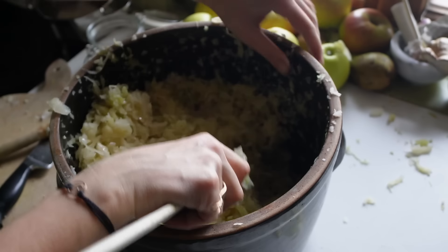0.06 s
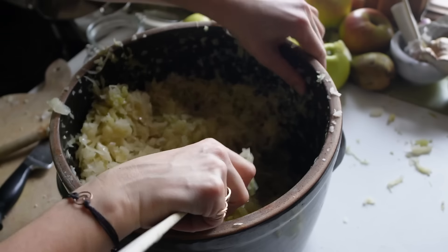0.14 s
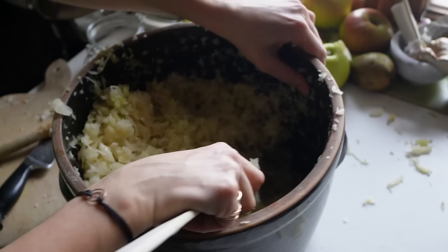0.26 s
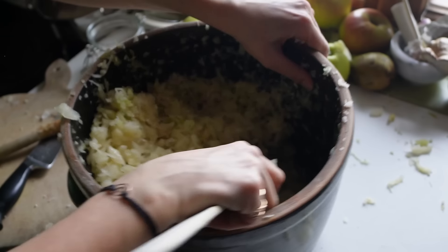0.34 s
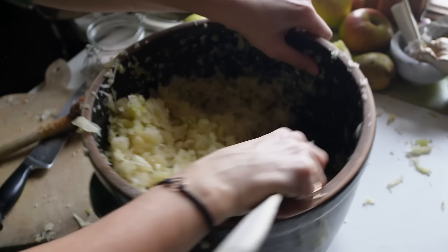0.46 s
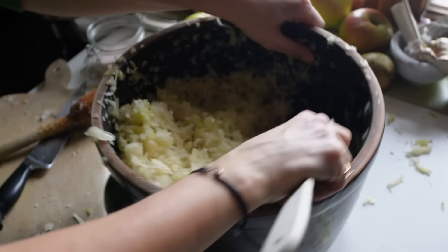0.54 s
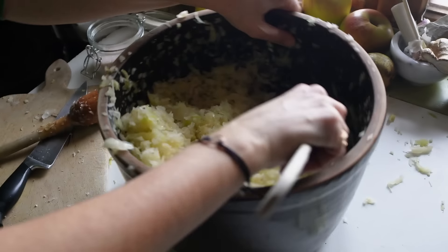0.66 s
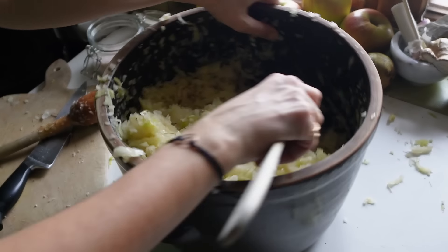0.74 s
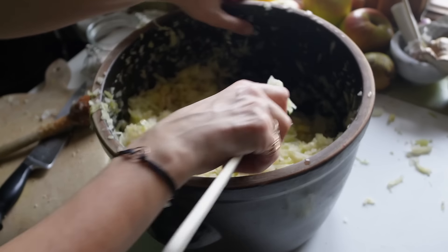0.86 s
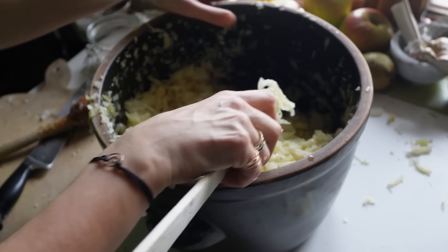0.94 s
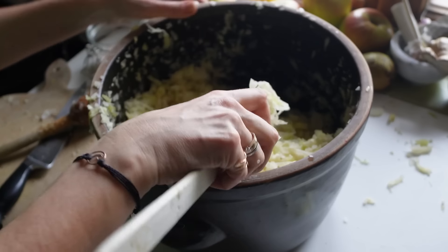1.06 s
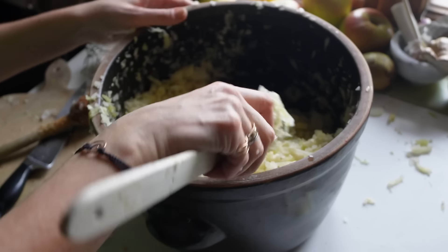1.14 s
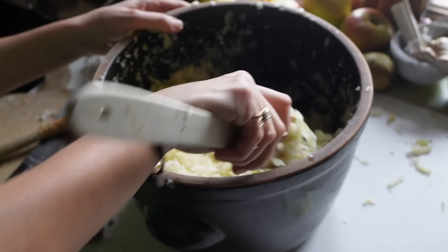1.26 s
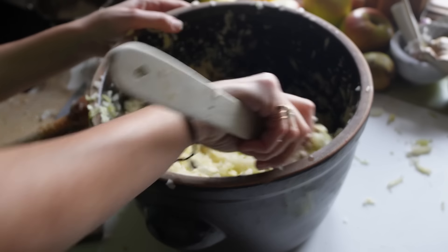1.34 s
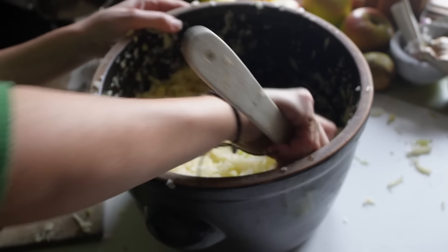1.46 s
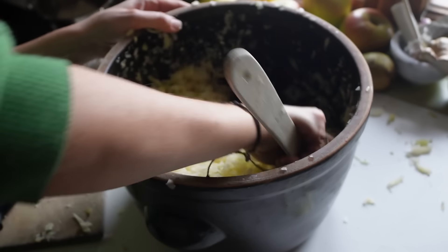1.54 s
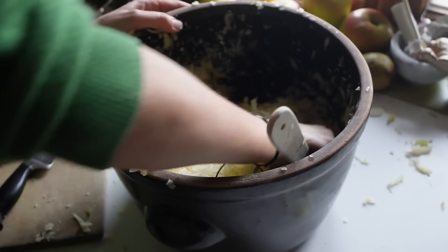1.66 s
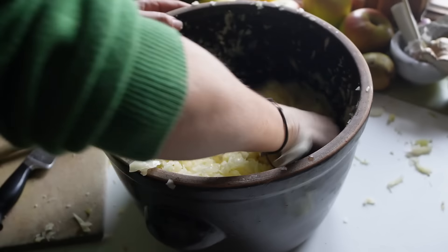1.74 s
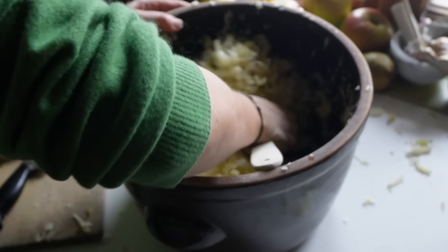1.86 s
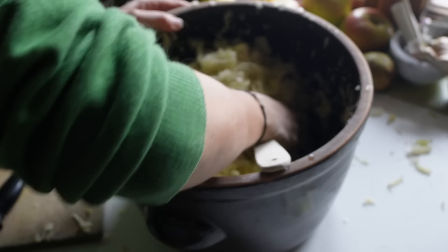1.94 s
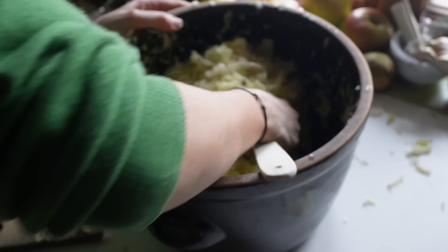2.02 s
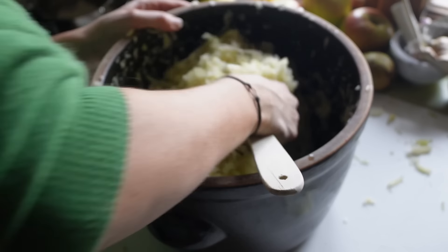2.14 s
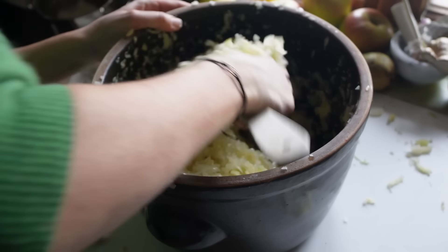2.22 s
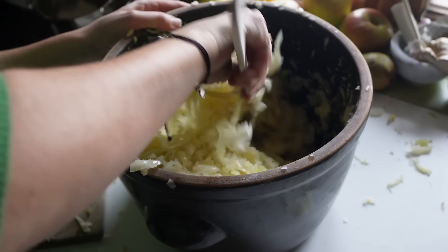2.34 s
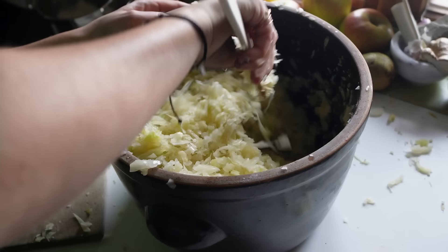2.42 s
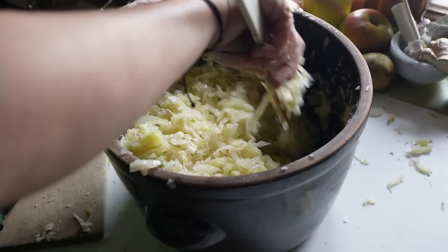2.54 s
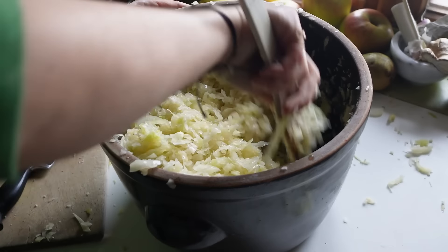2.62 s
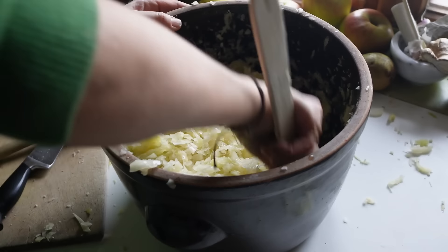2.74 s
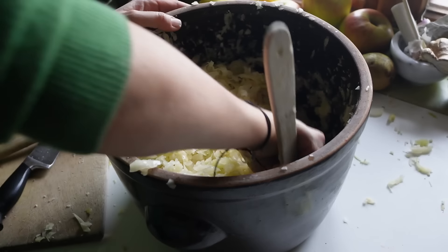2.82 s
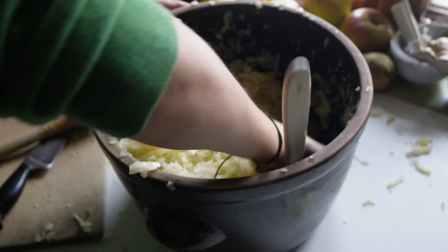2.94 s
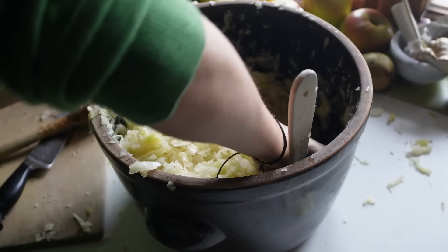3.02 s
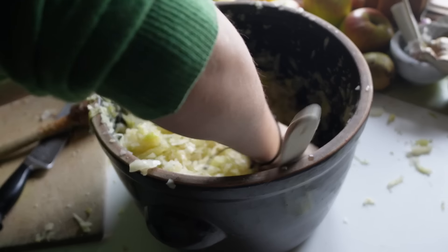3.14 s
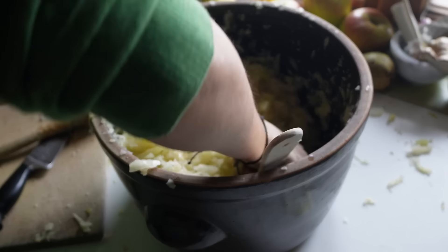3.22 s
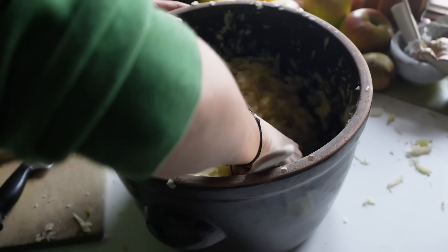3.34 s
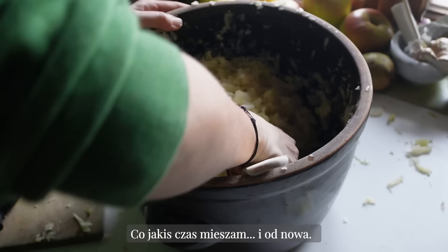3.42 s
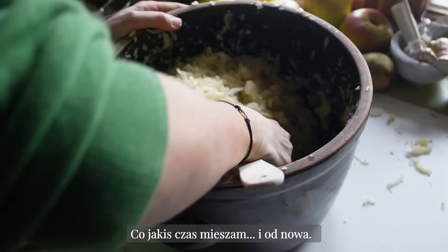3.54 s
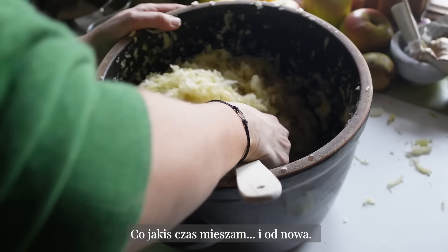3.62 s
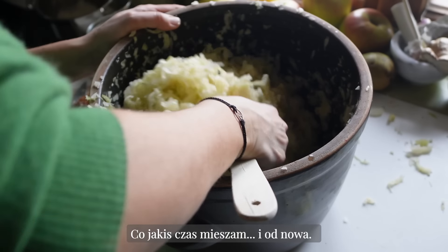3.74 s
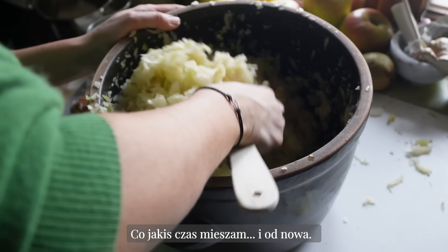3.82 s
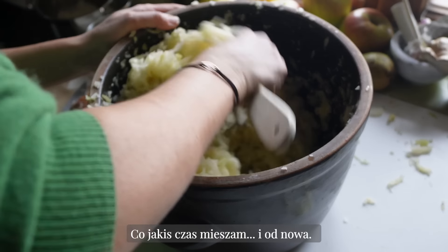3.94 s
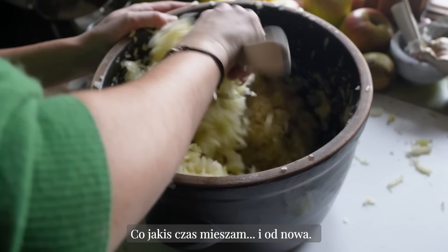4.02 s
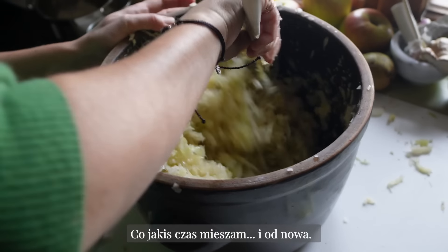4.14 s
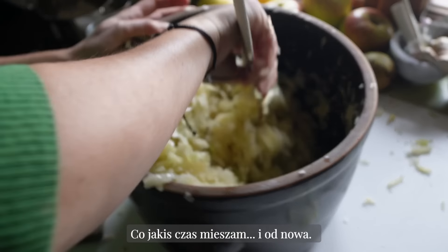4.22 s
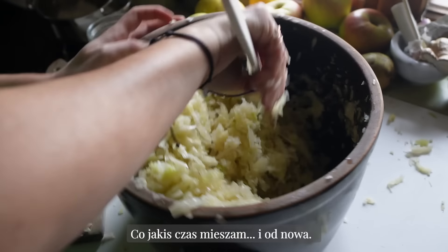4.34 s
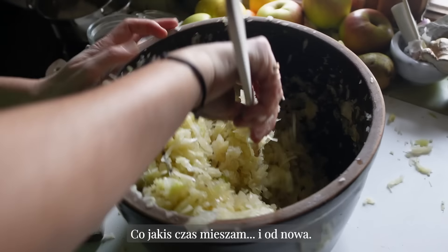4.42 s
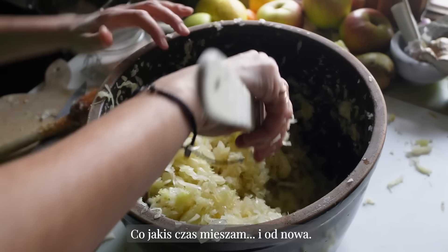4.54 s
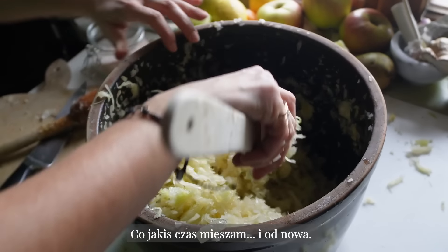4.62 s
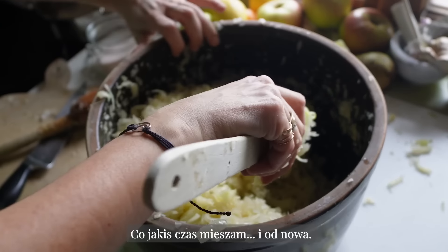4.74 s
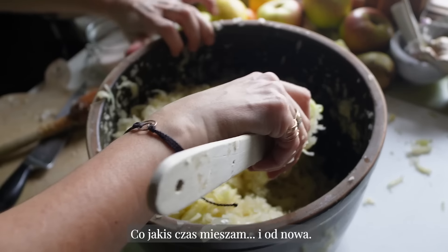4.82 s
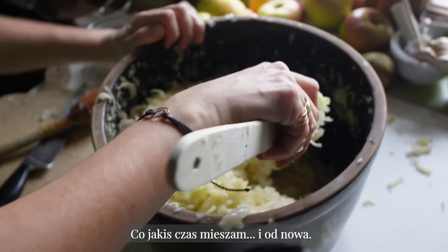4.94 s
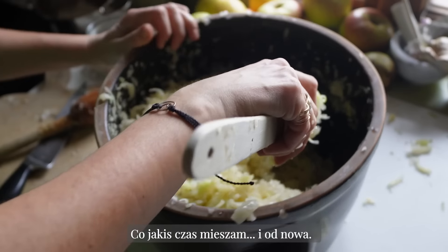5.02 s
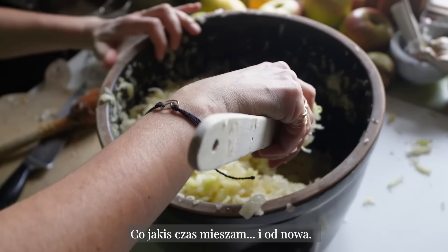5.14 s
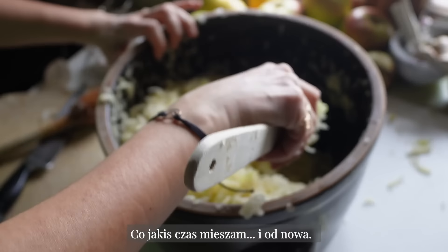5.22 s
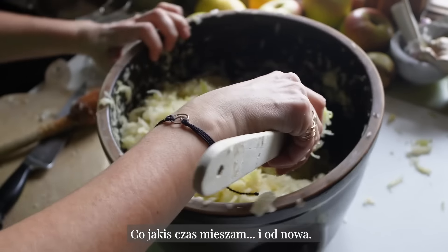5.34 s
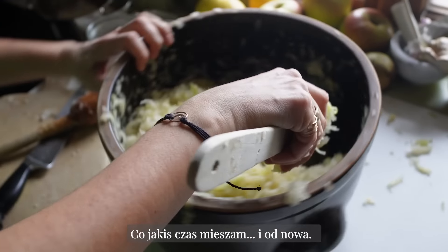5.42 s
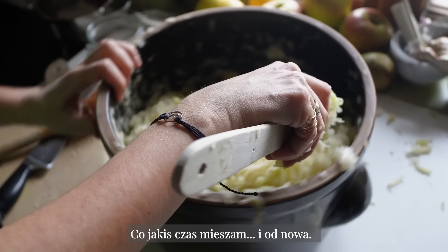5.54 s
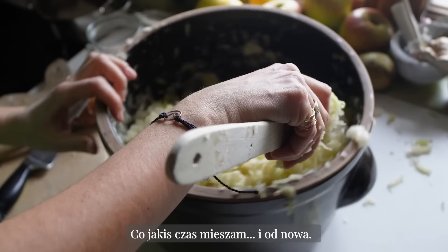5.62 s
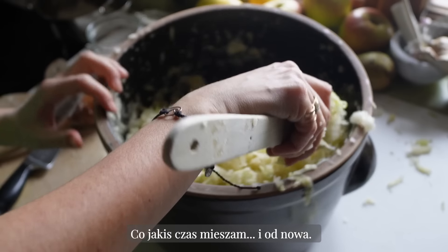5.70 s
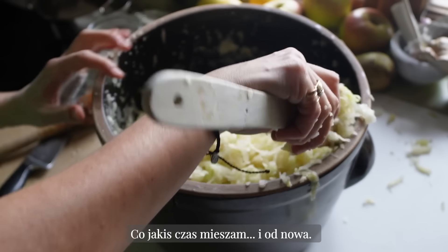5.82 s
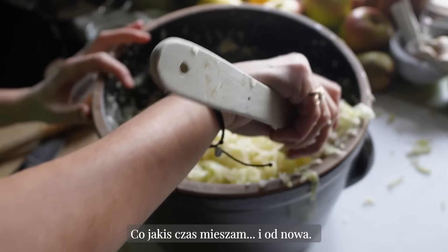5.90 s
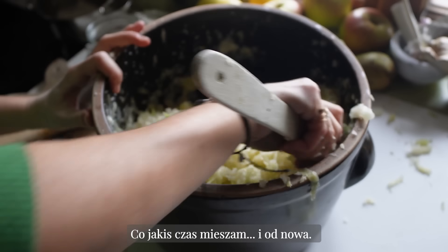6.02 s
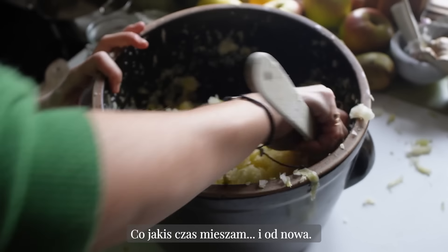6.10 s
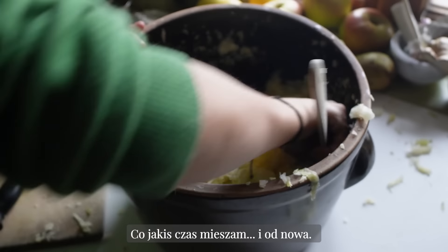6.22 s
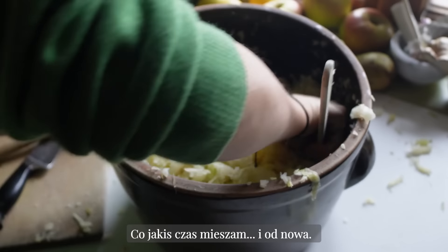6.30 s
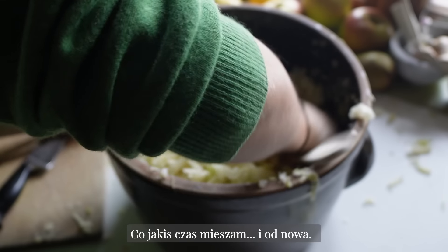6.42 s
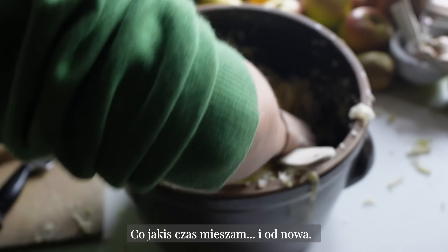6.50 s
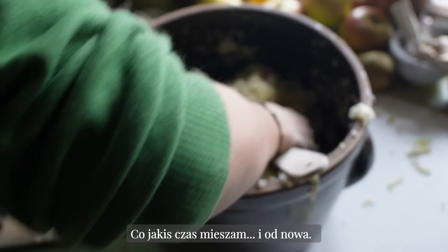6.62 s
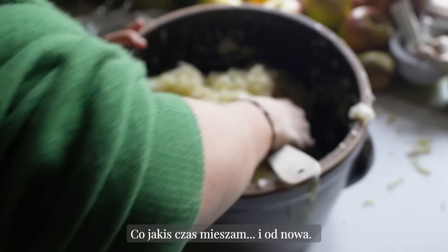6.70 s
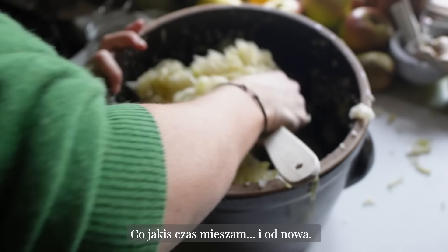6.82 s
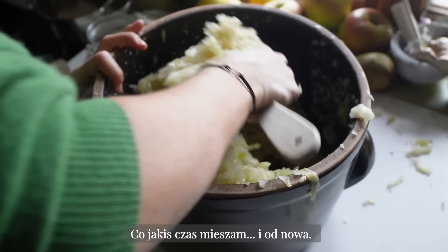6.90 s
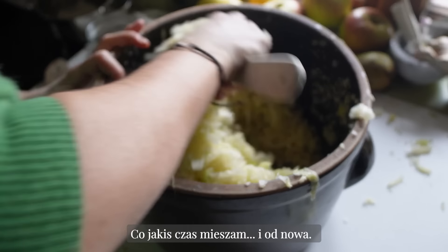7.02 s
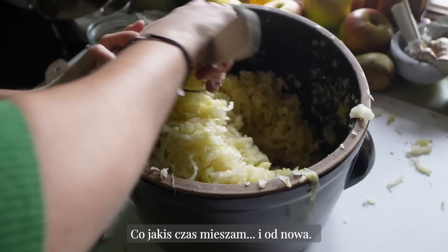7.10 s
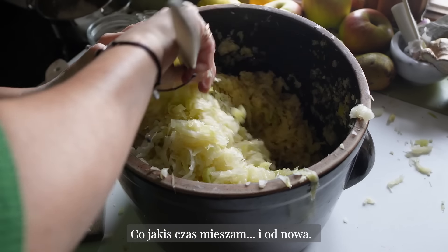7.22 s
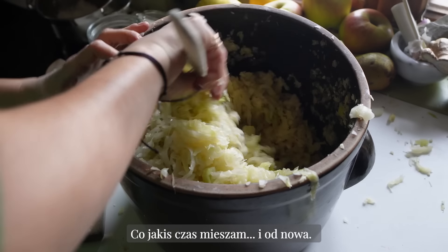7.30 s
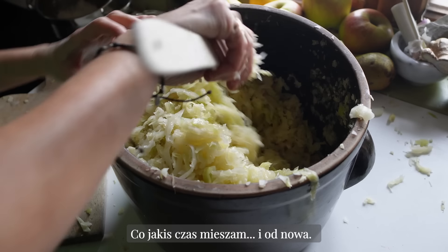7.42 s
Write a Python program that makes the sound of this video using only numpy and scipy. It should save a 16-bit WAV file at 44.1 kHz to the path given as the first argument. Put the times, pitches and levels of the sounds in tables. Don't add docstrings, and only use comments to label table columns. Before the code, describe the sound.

A heavy stoneware crock grinds across a table in bursts while a wooden paddle digs wet shredded cabbage, squelching and clacking sharply on the rim.

```python
import sys
import numpy as np
from scipy import signal
from scipy.fft import rfft, irfft, next_fast_len
from scipy.io import wavfile
from scipy.ndimage import map_coordinates

SR = 44100
rng = np.random.default_rng(int(sys.argv[2]) if len(sys.argv) > 2 else 0)


def amplitude_ratio(level_db):
    exponent = np.asarray(level_db, float) / 20
    return 10 ** exponent


def persist_wave(psi):
    counts = np.round(np.clip(psi, -1, 1) * 32767).astype(np.int16)
    wavfile.write(sys.argv[1], SR, np.atleast_2d(counts).T)


N = 328986

# (centre [Hz], width [Hz], level [dB])
TABLE_MODES = [(91, 39, -7), (192.5, 16.3, 5.5), (285.2, 37, 2.5), (324.2, 46, 4.5)]
# (centre [Hz], width [Hz], level [dB])
FOOT_MODES = [(428, 34.3, 3.5), (489.5, 24.6, 6), (562, 17, 5), (619, 67, -0.5), (718, 43.5, 1),
              (851.5, 61, -1.5), (990, 44, -5), (1073, 35, -16.5), (1110, 19, -23)]
# (centre [Hz], width [Hz], level [dB])
WALL_MODES = [(1081, 22, -2.5), (1950, 35, -5.5), (2734, 89, -9), (3440, 104, -11), (4250, 115, -8)]
# (frequency [Hz], density [dB per Hz])
GLAZE_COLOUR = [(3530, -4), (6000, -9), (6840, -16.5), (7640, -5), (8650, 4), (9980, -8), (14100, -9.5),
                (15200, -22), (16000, -25)]


def unit(x):
    return x / np.sqrt(np.mean(x ** 2) + 1e-20)


def filtered(x, response):
    m = next_fast_len(len(x) + 8192)
    hz = np.fft.rfftfreq(m, 1 / SR) + 1e-3
    return irfft(rfft(x, m) * response(hz), m)[:len(x)]


def colour(points):
    f, db = np.transpose(points)
    return lambda hz: amplitude_ratio(np.interp(np.log(hz + 1), np.log(f), db, left=-70))


def body(modes):
    def response(f):
        total = 0
        for k, (centre, width, db) in enumerate(modes):
            total = total + (-1) ** k * amplitude_ratio(db) * 1j * f * width / (centre ** 2 - f ** 2 + 1j * f * width)
        return total
    return response


def in_phase(modes):
    return lambda f: sum(body([mode])(f) for mode in modes)


def noise(t, response):
    return unit(filtered(rng.standard_normal(len(t)), response))


def hiss(t, low_hz, high_hz):
    def band(f):
        rise = (f / low_hz) ** 2
        return rise / (1 + rise) / (1 + (f / high_hz) ** 2)
    return noise(t, band)


def grains(per_s, spread_db, clump_db, clump_hz, t60):
    sizes = amplitude_ratio(spread_db * np.minimum(rng.exponential(size=N), 3.5))
    hits = (rng.random(N) < per_s / SR) * sizes
    knots = rng.standard_normal(N // 100)
    hits = hits * amplitude_ratio(clump_db * map_coordinates(knots, [np.arange(N) * clump_hz / SR]))
    power = signal.lfilter([1], [1, -amplitude_ratio(-120 / (abs(t60) * SR))], hits ** 2)
    return np.sqrt(np.abs(power)) * rng.standard_normal(N)


def add(track, s, sound):
    part = track[round(s * SR):][:len(sound)]
    part += sound[:len(part)]


def follow(law, db, lean_db, middle_db):
    return law[0] + law[1] * (db - middle_db) + law[2] * lean_db


def kitchen():
    # (frequency [Hz], density [dB per Hz])
    room_tone = [(12, -26.5), (20, 2.5), (71, -6), (114, -4), (216, -6), (330, -10.5), (516, -6.5),
                 (722, -6.5), (1100, -9), (1670, -11.5), (2850, -10), (3100, -15.5), (3570, -13),
                 (13700, -26.5), (16200, -34)]
    bed = grains(9000, spread_db=3.5, clump_db=1.55, clump_hz=3.3, t60=0.013)
    return amplitude_ratio(-56.5) * unit(filtered(bed, colour(room_tone)))


def bumps():
    # (time [s], peak [dB], pitch [Hz], t60 [s], deep thump [dB])
    nudges = [(.148, -49.5, 94, 0.11, -9), (0.256, -36, 188, 0.12, -15), (0.308, -30, 320, 0.11, -13.5),
              (1.95, -38, 190, 0.16, -20), (.933, -28, 290, 0.12, -9.5), (1.721, -22, 216, 0.24, -15.5),
              (1.798, -25.5, 433, 0.24, -35), (2.742, -33, 330, 0.17, -16), (3.0155, -26, 450, .1, -25),
              (3.0212, -20, 390, 0.22, -15.5), (3.183, -19, 270, 0.19, -12.5), (3.214, -31, 152, 0.25, -15),
              (3.416, -39, 428, 0.41, -21), (4.071, -39, 380, 0.11, -27), (4.928, -22.5, 190, 0.13, -18),
              (4.964, -18.5, 307, 0.11, -9.5), (6.336, -24.5, 378, 0.081, -14), (6.474, -28, 183, 0.2, -26),
              (6.492, -16.5, 434, 0.21, -17.5), (6.529, -26.5, 465, 0.15, -13), (6.73, -45, 250, 0.12, -18),
              (6.34, -33, 180, .2, -20), (7.12, -54, 135, .4, -20), (4.232, -28, 330, .06, -30)]
    out, t = np.zeros(N), np.arange(SR // 3) / SR
    for s, db, pitch, t60, deep_db in nudges:
        u = t * pitch / .8
        push = u * np.exp(1 - u) * np.sin(2 * np.pi * pitch * t)
        fade = amplitude_ratio(-60 * t / abs(t60)) * (1 - np.exp(-t / 0.0024))
        rumble = fade * noise(t, body(TABLE_MODES + FOOT_MODES[:4]))
        knock = amplitude_ratio(-60 * t / .025) * noise(t, lambda f: body([(900, 800, 0)])(f) ** 3)
        thump = .7 * np.sin(2 * np.pi * 48 * t) + 1.7 * np.sin(2 * np.pi * 90 * t)
        deep = thump * amplitude_ratio(deep_db - 5 - 60 * t / 0.26) * (1 - np.exp(-t / 0.0053))
        add(out, s, amplitude_ratio(db) * (-.9 * push + 0.4 * rumble + deep + .4 * knock))
    return out


def scuffs():
    # (time [s], peak [dB], brightness [dB], t60 [s])
    slips = [(1.37, -24.5, -41, 0.094), (1.7205, -23, -7, 0.055), (2.953, -25.5, -28, 0.048),
             (2.978, -26, 1, 0.065), (3.0156, -20, -21, 0.072), (3.2161, -34, -27, 0.082),
             (4.1533, -33.5, -1.5, 0.085), (4.9053, -29.5, -23, 0.24), (5.988, -32, -6, 0.05),
             (6.0184, -30.5, 4.5, 0.048), (6.0436, -27, 0.5, 0.062)]
    # (start [s], end [s], pitch [Hz], level [dB])
    squeaks = [
        (3.987, 4.096, 2800, -54),
        (6.35, 6.465, 2740, -48),
        (2.05, 2.11, 1080, -45),
        (4.17, 4.28, 1550, -48),
        (4.2, 4.33, 3000, -51),
        (4.62, 4.76, 2700, -56),
        (4.915, 5.0, 1060, -41),
        (4.92, 5.02, 2000, -47),
        (4.92, 5.02, 3000, -50),
    ]
    out, t = np.zeros(N), np.arange(SR // 4) / SR
    for s, db, bright_db, t60 in slips:
        slip = amplitude_ratio(-60 * t / 0.0037) + 0.36 * amplitude_ratio(-60 * t / abs(t60))
        smear = hiss(t, 800, 6000) + amplitude_ratio(bright_db) * hiss(t, 5300, 13000)
        add(out, s, amplitude_ratio(db - 8.5) * slip * smear)
    for start, end, hz, db in squeaks:
        t = np.arange(round((end - start) * SR)) / SR
        wander = np.cumsum(rng.standard_normal(len(t))) * .15
        swell = np.sin(np.pi * t / t[-1]) ** .5
        add(out, start, amplitude_ratio(db) * swell * np.sin(2 * np.pi * hz * t + wander))
    return out


def stirring(law):
    # (time of peak [s], peak [dB], time to rise 20 dB [s], time to fall 20 dB [s], crispness [dB])
    strokes = [ (1.372, -45, .005, .11, 2), (5.99, -61, .005, .1, 14), (1.525, -48.5, 0.05, 0.17, 4),
               (1.64, -43, 0.2, 0.34, -2), (1.716, -40, 0.21, .04, -1.5), (1.83, -33, .03, .09, 9),
               (1.865, -34.5, .08, .05, 6), (1.955, -43, .03, .04, 3), (2.085, -41, .04, .04, 6),
               (2.07, -41, 0.21, 0.16, 0), (2.14, -52.5, .05, 0.35, 2), (2.93, -51.5, 0.23, 0.6, -3),
               (3.021, -43.5, 0.34, -0.04, 0), (3.17, -57, .2, .05, 6), (3.2, -44.5, 0.05, 0.25, -5),
               (3.434, -49, -0.17, 0.38, -10), (3.608, -46.5, 0.67, 0.32, -3), (3.78, -56, 0.2, 0, 3),
               (4.08, -59.5, 1, 2.1, 5), (6.245, -46.5, 0.27, .2, 6), (6.33, -44.5, 0.18, 0.3, -7),
               (6.483, -41.5, 0.16, 0.28, -2.5), (6.6, -49.5, 0.23, 0.03, -5),
               (6.75, -48.5, 0.15, 0.1, -6.5), (6.854, -56.5, -1, 0.5, 4.5), (7.1, -61, 0, .6, 2),
               (2.35, -60, 0.3, 0.5, 4.5), ]
    t, power = np.arange(0, N + 64, 64) / SR, 0
    for s, db, rise, fall, crisp_db in strokes:
        from_peak = np.where(t < s, (s - t) / abs(rise), (t - s) / abs(fall))
        power = power + amplitude_ratio(follow(law, db, crisp_db, -45) - 20 * from_peak) ** 2
    return np.interp(np.arange(N) / SR, t, np.sqrt(power))


def shreds():
    # (level at a -45 dB stroke [dB], slope [dB per dB of stroke], lean [dB per dB of crispness])
    squelch_law = (-46, 1.24, -.2)
    shove_law = (-49.5, 0.83, -0.17)
    crackle_law = (-50.5, 0.87, 1)
    fizz_law = (-56.5, 0.72, 1.36)
    # (frequency [Hz], density [dB per Hz])
    squelch_colour = [(290, -46), (500, -6.5), (660, -1), (733, -0.5), (1080, 1), (1310, -2), (1960, -5.5),
                      (3000, -17.5), (3900, -44), (6600, -120)]
    shove_colour = [(24, -38), (40, -10), (135, -18), (193, -5.5), (259, -13), (395, 2.5), (565, -8),
                    (850, -8.5), (1100, -21), (1870, -120)]
    crackle_colour = [(1060, -21), (1800, -10.5), (1960, -11.5), (2160, -6), (4610, -9), (5080, -15.5),
                      (6500, -28), (8450, -41.5), (14300, -120)]
    fizz_colour = [(3500, -20), (5000, 1), (6500, 1.5), (8700, 2), (10700, -12), (14000, -4), (16000, -17)]
    # (time [s], peak [dB],
    # pitch [Hz])
    snaps = [(.162, -50, 6500), (.181, -50, 6000), (.25, -49, 8000), (0.921, -36, 8000), (.972, -44, 8000),
             (1.085, -47, 5940), (6.33, -38, 2500), (.29, -49, 9000), (1.528, -42, 2820),
             (1.585, -50, 6500), (1.668, -53, 4700), (1.944, -44.5, 2400), (1.958, -35, 1600),
             (1.99, -51, 4000), (2.08, -42, 7000), (2.333, -47, 2850), (2.391, -38.5, 1800),
             (2.418, -47, 1600), (2.9, -37.5, 3600), (3.19, -45, 6000), (3.223, -37, 4370),
             (3.231, -42, 4480), (3.67, -58, 5000), (6.146, -41, 3180), (6.449, -37, 2900),
             (6.732, -43, 1990), (6.8005, -36, 2660), (6.836, -46, 6930), (7.003, -48, 5100),
             (7.362, -48, 4000)]
    # (time [s], peak [dB], pitch [Hz])
    drips = [(2.528, -55, 1500), (2.612, -57, 8000), (2.6608, -55, 5220), (2.724, -53, 2600),
             (2.873, -53, 7000), (3.3057, -54, 3680), (3.3781, -54, 3350), (3.5587, -49, 4290),
             (3.5841, -53, 3910), (3.7642, -53, 3310), (4.0585, -52, 4670), (6.9776, -52, 4500),
             (7.027, -52, 3000), (2.04, -47, 5000), (2.107, -45, 4200), (2.127, -48, 5500)]
    # (time [s], peak [dB], pitch [Hz])
    edges_of_blows = [(.3085, -33, 750), (1.7205, -30, 1000), (1.724, -29, 650), (1.8128, -21, 1800),
                      (1.813, -26, 4000), (1.824, -33, 7500), (1.926, -45, 6500), (1.991, -40, 2000),
                      (2.7408, -21, 8600), (2.7408, -17, 2700), (2.9525, -36, 3300), (2.9525, -39, 700),
                      (3.181, -31, 800), (6.4911, -14, 5500), (6.4925, -10, 2600), (6.52, -22, 2700)]

    def on_wall(spectrum):
        return lambda f: colour(spectrum)(f) * (1 + 1.2 * in_phase(WALL_MODES)(f))

    mass = grains(330, spread_db=2.0, clump_db=2.5, clump_hz=13, t60=0.038)
    wet = grains(500, spread_db=2, clump_db=2.1, clump_hz=29.6, t60=0.044)
    crisp = grains(600, spread_db=3.0, clump_db=-0.7, clump_hz=33.5, t60=0.017) + 0.34 * wet
    froth = grains(1200, spread_db=3.5, clump_db=2.5, clump_hz=34.17, t60=0.016) + 0.42 * crisp
    out = stirring(shove_law) * unit(filtered(mass, colour(shove_colour)))
    out += stirring(squelch_law) * unit(filtered(wet, on_wall(squelch_colour)))
    out += stirring(crackle_law) * unit(filtered(crisp, on_wall(crackle_colour)))
    out += stirring(fizz_law) * unit(filtered(froth, colour(fizz_colour)))
    t = np.arange(SR // 25) / SR
    for s, db, pitch in snaps + drips + edges_of_blows:
        snap = amplitude_ratio(-60 * t / .016) * noise(t, lambda f: body([(pitch, .35 * pitch, 0)])(f) ** 2)
        add(out, s, amplitude_ratio(db + 4) * snap / np.abs(snap).max())
    return out


def rim_ring(t, modes, blur, free=1):
    total = 0
    for hz, db, t60 in modes:
        fade = amplitude_ratio(db + rng.normal(0, 2.1) - 60 * t / (t60 * free))
        wander = blur * np.cumsum(rng.standard_normal(len(t)))
        total = total + fade * np.sin(2 * np.pi * hz * t + wander)
    return total


def paddle():
    # (time [s], peak [dB], click [Hz], high ring [dB], brightness [dB])
    clacks = [
        (1.8128, -12, 2930, -18, -25),
        (2.7407, -5, 4280, -24, -11),
        (6.2532, -24.5, 4350, -22, 2),
        (6.2562, -19, 4260, -21, 6),
        (6.4921, -0.5, 3600, -33, -10.5),
        (6.702, -39, 2000, -15, -27),
    ]
    # (pitch [Hz], level [dB], t60 [s])
    rim_low = [(420, -11, 0.28), (1076, 2.5, 0.1), (1088, -10, 0.3), (1324, -16, .12), (1712, -9, .06),
               (1942, -9, 0.15)]
    rim_high = [(2640, -10, .3), (2800, -19, 0.136), (3100, -9, 0.12), (3260, 0, 0.09), (3630, -7, 0.31),
                (3880, -4, 0.16), (4480, -12.5, .25), (5600, -8, .15)]
    # (frequency [Hz], density [dB per Hz])
    wall_answer = [(760, -37), (1300, -12), (1780, -10.5), (1960, -2), (2570, 0.5), (2830, 0), (5660, -9.5),
                   (13800, -24.5), (16000, -47)]
    out, t = np.zeros(N), np.arange(SR // 2) / SR
    near, far = amplitude_ratio(-60 * t / 0.025), amplitude_ratio(-60 * t / 0.34)
    for s, db, pitch, high_db, bright_db in clacks:
        u = t / .0005
        click = u ** 2 * np.exp(2 - 2 * u) * np.sin(2 * np.pi * pitch * t)
        click = click + 0.17 * amplitude_ratio(-60 * t / .02) * np.sin(2 * np.pi * 2680 * t)

        def echo(f):
            struck = body([(pitch, 1.3 * pitch, 0)])(f) * (1 + 1.5 * in_phase(WALL_MODES[2:])(f))
            return colour(wall_answer)(f) * struck

        wash_db = -3.5 * max(pitch - 3500, 0) / 1000
        walls = amplitude_ratio(wash_db) * noise(t, echo) * (amplitude_ratio(-9) * near + amplitude_ratio(-23.5) * far)
        crack = amplitude_ratio(bright_db) * hiss(t, 3950, 6500) * amplitude_ratio(-60 * t / 0.0067)
        shine = amplitude_ratio(bright_db) * noise(t, colour(GLAZE_COLOUR)) * (amplitude_ratio(-20) * near + amplitude_ratio(-30) * far)
        low_db = -((pitch - 1800) / 402) ** 2
        free = amplitude_ratio(.22 * np.clip(db + 10, 0, 12))
        rim = amplitude_ratio(low_db) * rim_ring(t, rim_low, .025, free) + amplitude_ratio(high_db) * rim_ring(t, rim_high, .09)
        add(out, s, amplitude_ratio(db) * (click + (walls + crack + shine + rim) * (1 - np.exp(-t / 0.0003))))
    return out


def catches():
    # (time [s], peak [dB], pitch [Hz])
    caught = [
        [(0.407, -21, 563), (0.517, -15, 374), (0.596, -15, 476), (0.849, -13, 320)],
        [(4.195, -27, 501), (4.281, -18, 514), (4.32, -15, 576), (4.345, -12, 452), (4.381, -10, 676),
         (4.399, -7, 409), (4.409, -10, 711), (4.422, -10, 439), (4.446, -11, 724)],
        [(5.396, -20, 479), (5.442, -14, 495), (5.495, -9, 848), (5.54, -6, 821), (5.567, -6, 546),
         (5.603, -7, 554), (5.721, -16, 877)],
    ]
    out, t = np.zeros(N), np.arange(SR // 50) / SR
    for s, db, pitch in sum(caught, []):
        u = t * pitch / .7
        add(out, s, amplitude_ratio(db - 9) * u * np.exp(1 - u) * np.sin(2 * np.pi * pitch * t))
    return out + 1.2 * filtered(out, in_phase(FOOT_MODES))


def sliding(law):
    # (time [s], drag [dB], quickness [dB])
    turns = [
        [(.25, -63, -3), (.34, -43.5, 0.5), (.464, -29.5, 3), (.526, -27.5, 2.5), (.66, -26.5, -0.5),
         (.864, -28.5, -2), (.934, -29.5, -4), (1.112, -69, 2)],
        [(4.1, -67, -0.15), (4.162, -44, 0.69), (4.235, -35.5, .5), (4.41, -20.5, 1.6), (4.494, -27, 1.5),
         (4.544, -31, -1), (4.626, -48, 0.85), (4.78, -79, 0.91)],
        [(4.84, -71, 4), (4.91, -41.5, -8.5), (4.926, -31.5, -0.5), (4.958, -32.5, -4), (5.096, -35, -4.5),
         (5.308, -69, 4.5)],
        [(5.33, -64, -2), (5.388, -35.5, -3.5), (5.442, -25.5, -1), (5.54, -17, 1), (5.684, -24, -2),
         (5.804, -33.5, -4), (5.858, -46.5, -3), (5.98, -77.5, 4)],
    ]
    t, gain = np.arange(N) / SR, 0
    for s, db, quick_db in map(np.transpose, turns):
        gain = gain + amplitude_ratio(np.interp(t, s, follow(law, db, quick_db, -30), -120, -120))
    return gain


def foot():
    # (level at a -30 dB drag [dB], slope [dB per dB of drag], lean [dB per dB of quickness])
    boom_law = (-34.5, 0.71, -1.2)
    grind_law = (-30, 1.044, 0.14)
    grit_law = (-36.5, 0.94, 0.72)
    glaze_law = (-53.5, 0.69, 1.9)
    # (frequency [Hz], density [dB per Hz])
    grit_colour = [(710, -17), (1200, 1), (1290, -5), (1550, -2.5), (1680, -8), (1900, -5), (2380, -11.5),
                   (3500, -16), (3740, -20), (7000, -35), (9100, -66), (15400, -120)]
    # (centre [Hz], width [Hz], level [dB])
    upper_modes = [(1190, 34, -0.5), (1570, 54, -3.5), (2194, 55, -3), (3000, 65, -2)]
    jolts = grains(1500, spread_db=1.55, clump_db=0.5, clump_hz=45.78, t60=0.0025)
    fine = grains(5000, spread_db=3.5, clump_db=-1.6, clump_hz=61.7, t60=0.0073) + 0.3 * jolts

    def radiated(modes, cut_hz):
        return lambda f: body(modes)(f) * (1j * f / (cut_hz + 1j * f)) ** 4

    def driven(push, response):
        return filtered(push * jolts, response) / np.std(filtered(jolts, response))

    def through_crock(f):
        return colour(grit_colour)(f) * (1 + 0.95 * in_phase(WALL_MODES[1:] + upper_modes)(f))

    boom = driven(sliding(boom_law), radiated(TABLE_MODES, 85.4))
    grind = driven(sliding(grind_law), radiated(FOOT_MODES, 250))
    grit = sliding(grit_law) * unit(filtered(fine, through_crock))
    glaze = sliding(glaze_law) * unit(filtered(fine, colour(GLAZE_COLOUR)))
    return boom + grind + grit + glaze


def scene():
    digging = bumps() + scuffs() + shreds() + paddle()
    turning = catches() + foot()
    return (kitchen() + digging + turning)[None]


def top_cut(x):
    return signal.sosfilt(signal.butter(12, 16340, fs=SR, output="sos"), x)


def record(dry):
    band = filtered(dry[0], lambda f: 1 / (1 + (f / 16150) ** 120))
    return top_cut(np.clip(band[None], -1, 1))


dry = scene()
out = record(dry)
persist_wave(out)
```